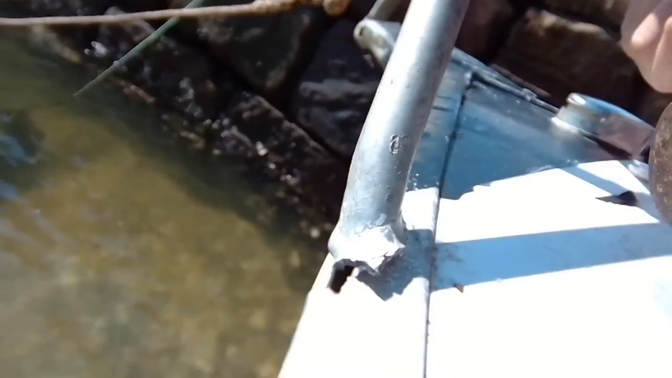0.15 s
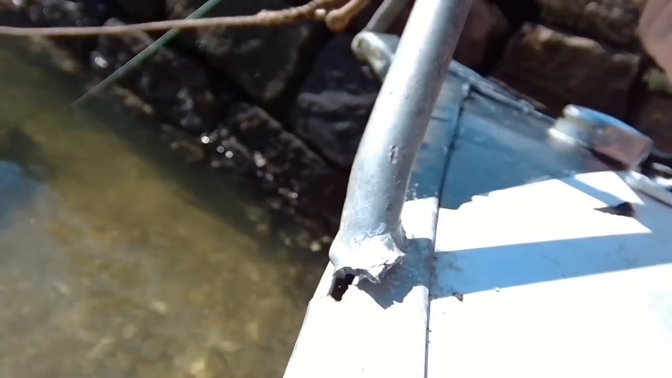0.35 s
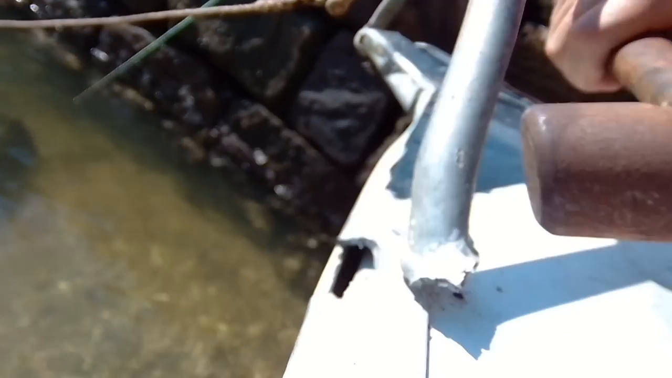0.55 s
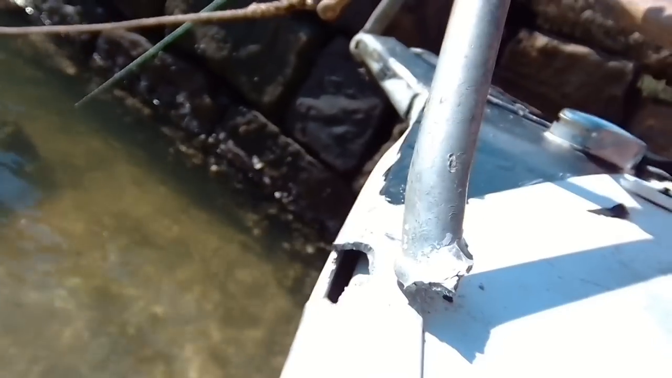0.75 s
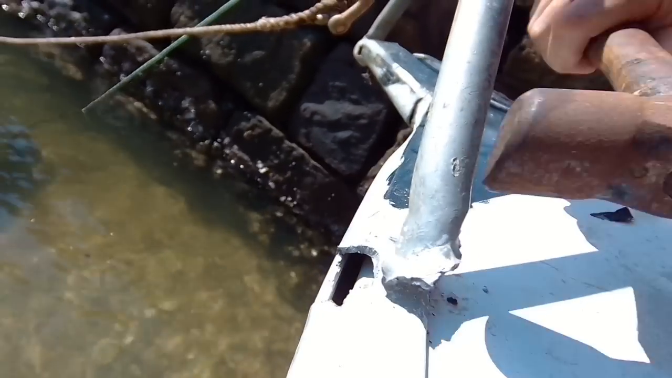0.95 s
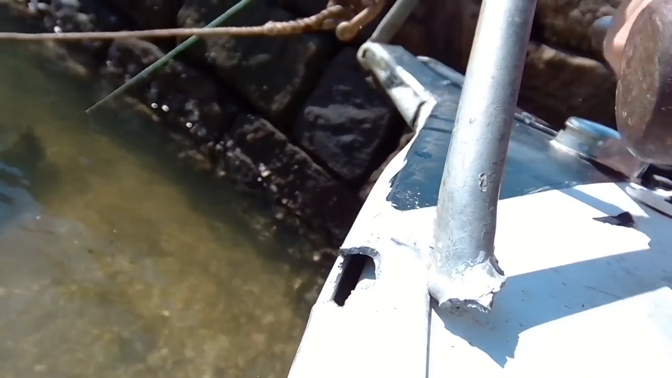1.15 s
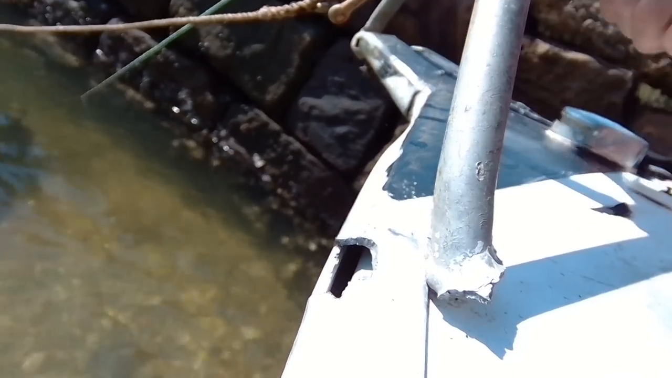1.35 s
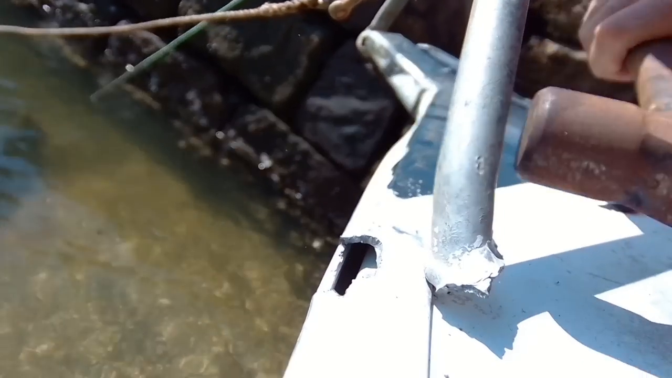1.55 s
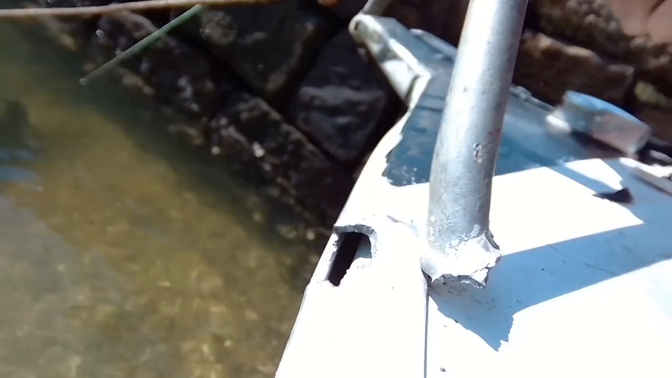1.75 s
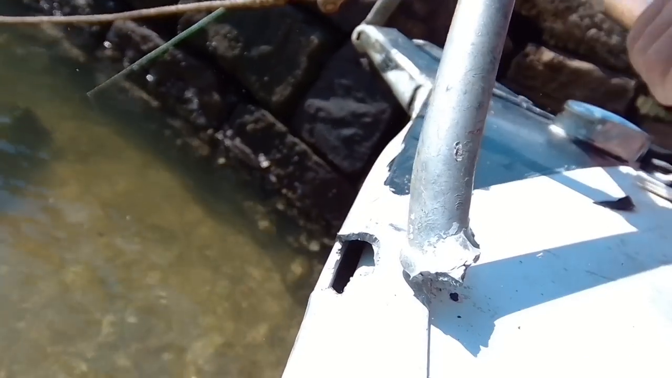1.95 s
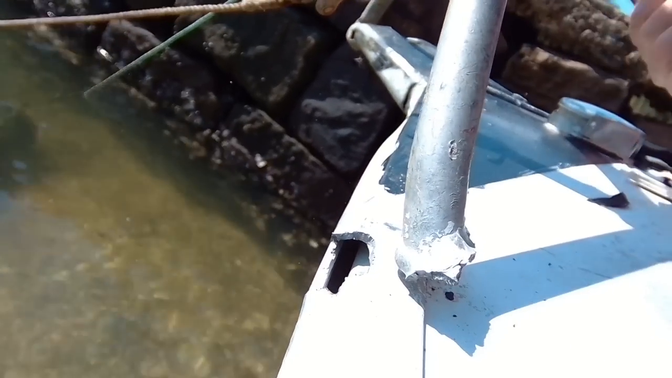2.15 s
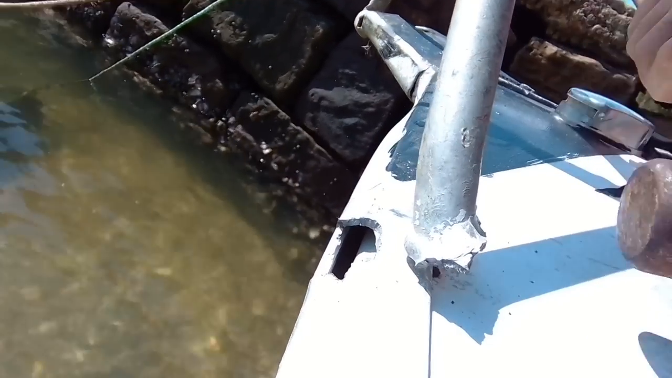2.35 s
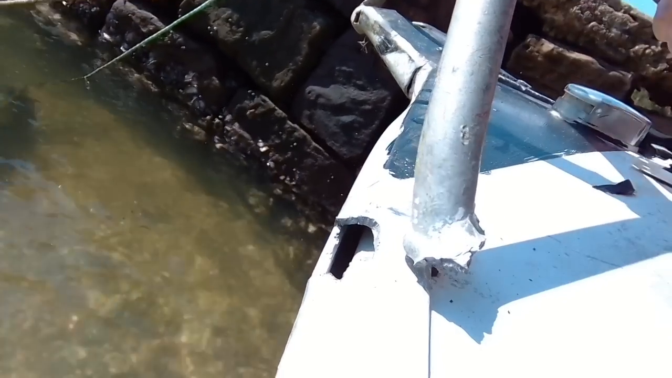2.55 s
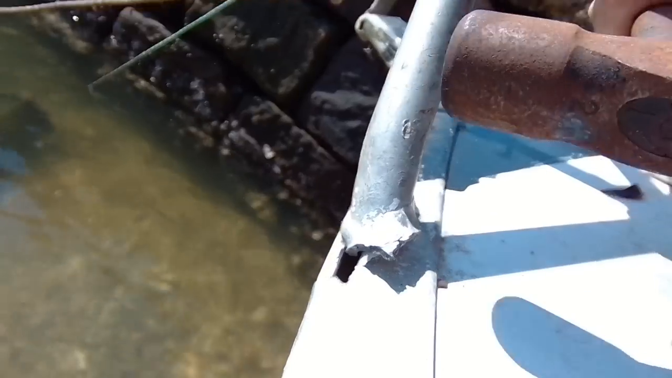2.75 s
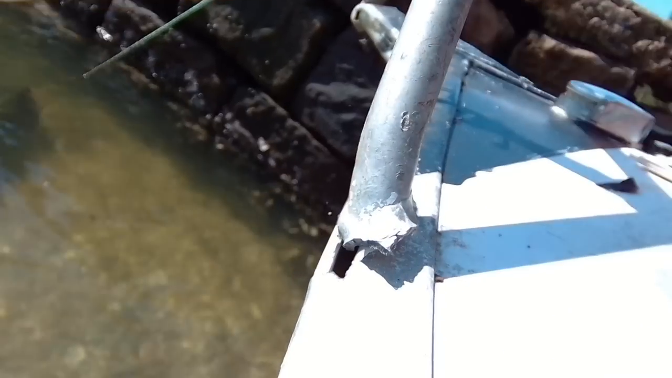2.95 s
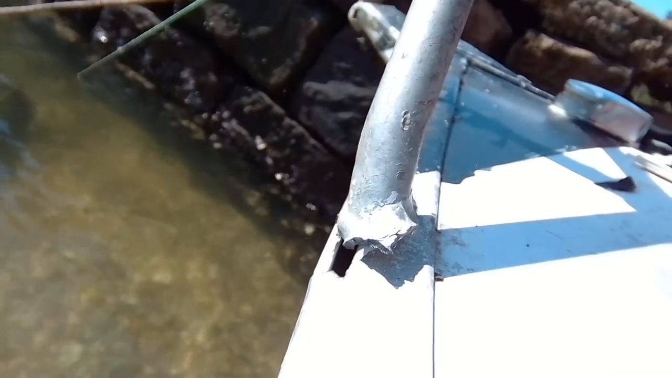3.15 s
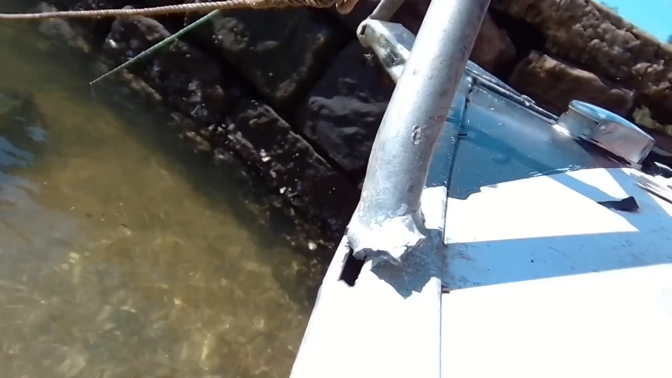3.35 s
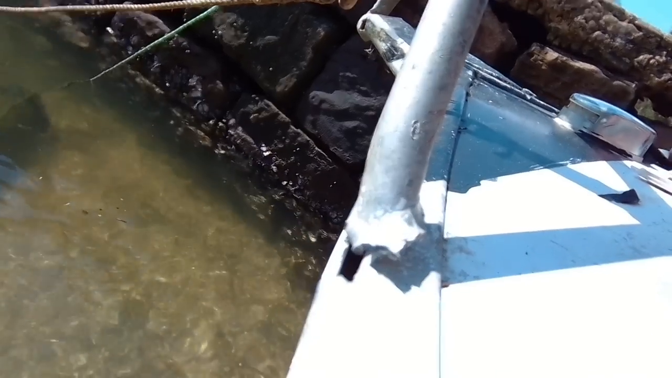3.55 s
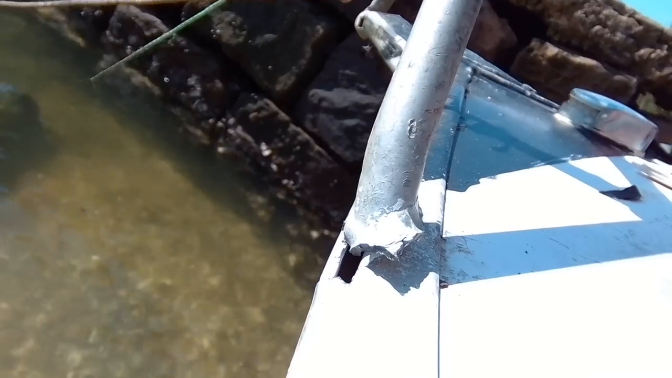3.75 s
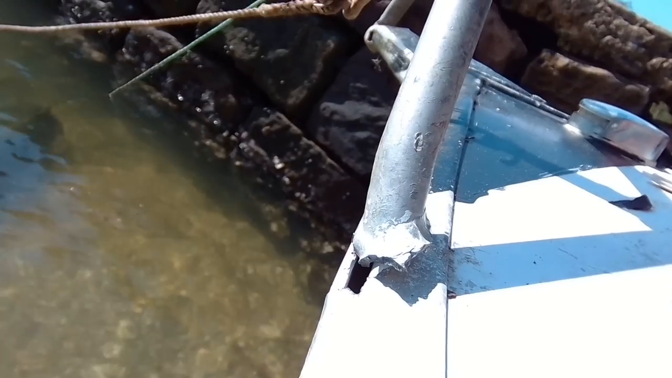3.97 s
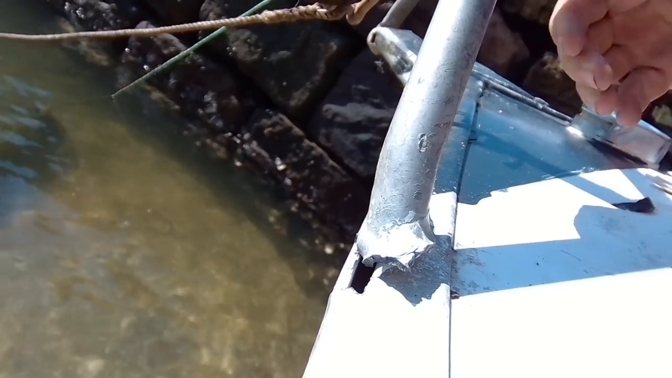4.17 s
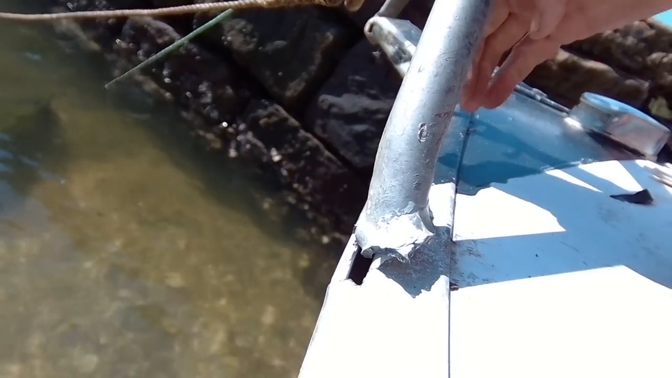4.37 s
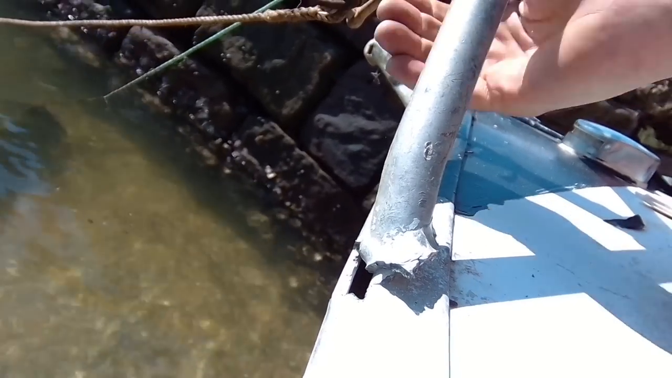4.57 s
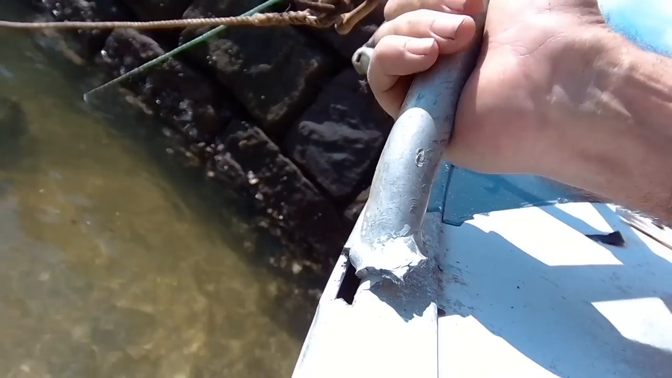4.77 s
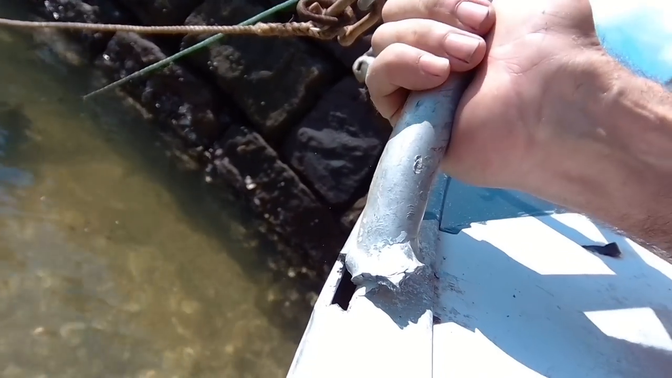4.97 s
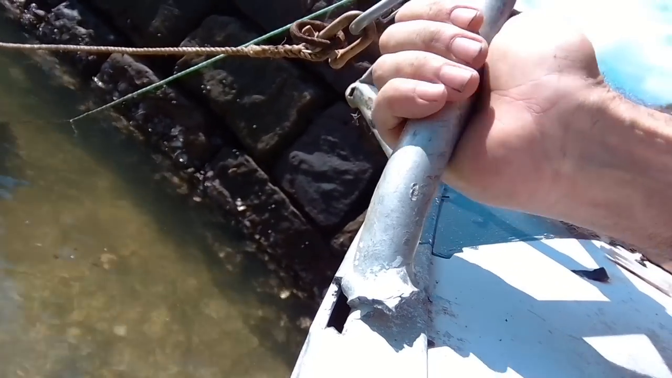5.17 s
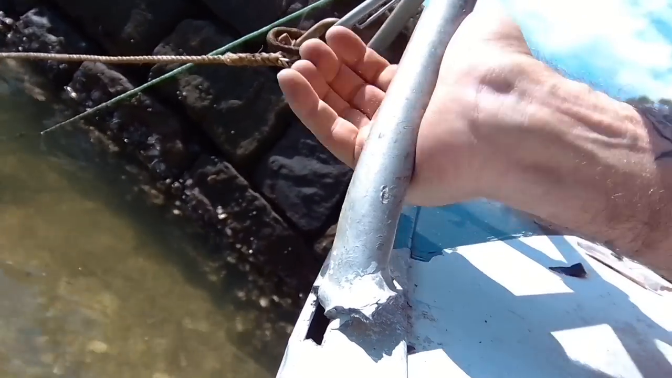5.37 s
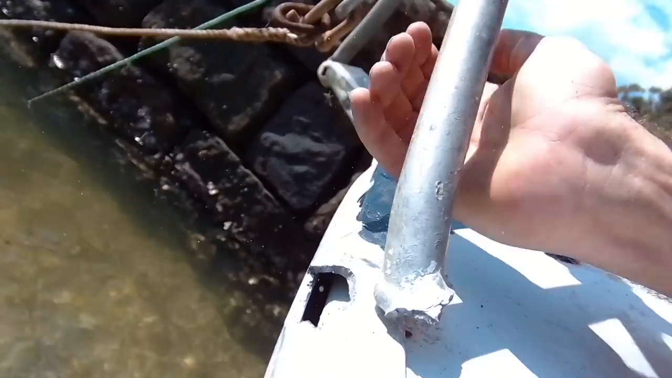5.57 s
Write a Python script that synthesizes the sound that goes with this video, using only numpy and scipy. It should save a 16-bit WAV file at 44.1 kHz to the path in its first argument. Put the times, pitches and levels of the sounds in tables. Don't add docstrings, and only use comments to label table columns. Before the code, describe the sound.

A heavy hammer clangs repeatedly on a hollow metal tube, each blow booming through a boat hull with rattling fittings, then is dropped and a hand tugs.

```python
import sys
import numpy as np
from scipy import signal
from scipy.fft import rfft, irfft, next_fast_len
from scipy.io import wavfile
from scipy.ndimage import uniform_filter1d, map_coordinates

SR = 44100
rng = np.random.default_rng(int(sys.argv[2]) if len(sys.argv) > 2 else 0)


def file_out(sig):
    cols = np.atleast_2d(sig).T
    lim = np.clip(cols, -1, 1)
    pcm = np.round(lim * 32767).astype(np.int16)
    wavfile.write(sys.argv[1], SR, pcm)


def linear_from_db(decibels):
    return 10 ** (np.asarray(decibels, float) / 20)


N = 247401
LOW_EDGE_HZ, TOP_EDGE_HZ = 2500, 9000


def unit(x):
    return x / np.sqrt(np.mean(x ** 2) + 1e-20)


def along(points, hz):
    f, v = np.transpose(points)
    return np.interp(np.log(hz + 1), np.log(f + 1), v)


def filtered(x, response):
    m = next_fast_len(x.shape[-1] + 8192)
    spectrum = rfft(x, m) * response(np.fft.rfftfreq(m, 1 / SR))
    return irfft(spectrum, m)[..., :x.shape[-1]]


def resonant(modes):
    def response(f):
        return sum((-1) ** k * linear_from_db(db) * 1j * f * width / (hz * hz - f * f + 1j * f * width)
                   for k, (hz, width, db) in enumerate(modes))
    return response


def tilt(low_db, top_db):
    points = [(LOW_EDGE_HZ * .8, low_db), (LOW_EDGE_HZ * 1.2, 0),
              (TOP_EDGE_HZ * .85, 0), (TOP_EDGE_HZ * 1.15, top_db)]
    return lambda f: linear_from_db(along(points, f))


def noise(count, colour):
    return unit(filtered(rng.standard_normal(count), colour))


def add(track, s, x):
    i = round(s * SR)
    track[i:i + len(x)] += x[:N - i]


def wobble(count, rate):
    knots = rng.standard_normal(int(count * rate / SR) + 4)
    return map_coordinates(knots, [np.arange(count) * rate / SR])


def ringing(hz, db, t60, t, blur=.8):
    flutter = 2.5 * wobble(len(t), rate=70)
    waver = blur * wobble(len(t), rate=50)
    return linear_from_db(db - 60 * t / t60 + flutter) * np.sin(2 * np.pi * hz * t + waver)


def stroke(start, peak, end, db):
    t = np.arange(N) / SR
    ends_db, edge_s = -17, 0.021
    swell = linear_from_db(db + np.interp(t, [start, peak, end], [ends_db, 0, ends_db]))
    return swell * np.clip(np.minimum(t - start, end - t) / edge_s, 0, 1)


# t/s, peak level/dB, low clang level/dB, top clang level/dB, wash level/dB
BLOWS = [(0.0991, -7, -8.5, -17, -19), (0.606, -12.5, -4.5, -13, -12.5), (0.6223, -20, -13, -25, -23),
         (1.0723, -7.5, -0.5, -16, -15), (1.511, -8, -1.5, -16.5, -15.5), (1.9324, -8, -6.5, -14.5, -15.5),
         (2.36, -11.5, -7, -12, -14.5), (2.7529, -10.5, -5, -16.5, -15.5)]
# first level/dB, then four levels/dB over the first
SPOTS = [(-18.5, -2, 3.5, 1, -23), (-21.5, 4.5, 7, -15.5, -21), (-35, 6.5, 17, -4, -21),
         (-15, -5, -2.5, -20, -30), (-23.5, -6, 5, -11, -25), (-11, -7.5, -10.5, -22.5, -28),
         (-15.5, -3.5, -9, 4, -21), (-14, -3.5, -15, -5, -22.5)]
SWAY_DB = [-40.5, -57.5, -59, -38.5, -39, -42, -43.5, -57.5]
# second, third and last strong mode f/Hz
BENT_HZ = [(3280, 4597, 3585), (3375, 4468, 4845), (3300, 4470, 4845), (3350, 4274, 4457),
           (3180, 4581, 3500), (3450, 4059, 3838), (3370, 4600, 4500), (3348, 3700, 6800)]
# f/Hz, level/dB
DENTS = [
    [(1200, -19.5), (1712, -21), (2401, -22), (4172, -23.5), (5389, -26)],
    [(1453, -24.5), (1965, -26), (2439, -26), (4307, -26), (7800, -28.5)],
    [(1453, -28), (1200, -26.5), (2410, -32), (4650, -24), (9530, -32.5)],
    [(1125, -16), (1276, -17.5), (1588, -22), (2132, -22), (5055, -24)],
    [(1109, -17.5), (1195, -17.5), (1650, -24.5), (2159, -25), (4888, -26.5)],
    [(1125, -21), (1432, -21.5), (2304, -20.5), (2428, -17.5), (5561, -25)],
    [(1206, -19), (1518, -25.5), (2353, -21), (3505, -24), (4829, -28.5)],
    [(1394, -18.5), (2051, -23.5), (2401, -23), (7036, -26.5), (8215, -24)],
]
# f/Hz, t60/s
DENT_T60 = [(1200, .14), (2400, 0.087), (5000, 0.071), (9000, .04)]
# f/Hz, level/dB, t60/s
STRONG_MODES = [(1850, -1, .1), (3320, -3, 0.08), (4610, -1.5, .08), (6890, 1, 0.039), (15710, 0.5, .16),
                (4920, -3, 0.07)]
# f/Hz, level/dB, t60/s
WEAK_MODES = [(3580, -25.5, .3), (4470, -23.5, 0.22), (8700, -10, 0.0098), (12100, -24, 0.083),
              (13800, -15.5, .03)]
# f/Hz, level/dB per Hz
CLANG = [(410, -24.5), (700, 2.5), (1960, -7), (2810, -8), (3290, -3.5), (4580, -6), (6370, -15.5),
         (6990, -17), (7560, -15), (15200, -36.5), (16500, -28)]
# f/Hz, level/dB per Hz
WASH = [(470, -10.5), (800, -6.5), (1920, -10), (2870, -26), (3560, -18), (3700, -24.5), (5620, -26),
        (12300, -36), (15500, -50), (16500, -45.5)]
# f/Hz, t60/s
WASH_T60 = [(800, 0.3), (2000, 0.31), (5000, 0.35), (10000, 0.17), (16000, .15)]


def hammer():
    out, t = np.zeros(N), np.arange(SR // 2) / SR
    for blow, spot, sway_db, bent, dent in zip(BLOWS, SPOTS, SWAY_DB, BENT_HZ, DENTS):
        s, db, low_db, top_db, wash_db = blow
        first_db, *over = spot
        modes = np.array(STRONG_MODES)
        modes[[1, 2, -1], 0] = bent
        lean = tilt(low_db + 2.5, top_db + 18.5)

        touch = np.minimum(t / .0006, 1) / (1 + (t / .012) ** 6)
        clang = touch * noise(len(t), lambda f: linear_from_db(along(CLANG, f)) * lean(f))

        lifts = [0] + over + over[1:2]
        ring = sum(ringing(hz, first_db + lift + level - 0.5, t60, t)
                   for (hz, level, t60), lift in zip(modes, lifts))
        ring += sum(ringing(hz, db + level - 13.0 + rng.normal(0, 5.3), t60, t)
                    for hz, level, t60 in WEAK_MODES)
        ring += sum(ringing(hz, level, along(DENT_T60, hz), t) for hz, level in dent)
        ring += ringing(461, sway_db + 3 * wobble(len(t), rate=20), 3.2, t, blur=0.77)

        source = noise(len(t), lambda f: linear_from_db(along(WASH, f)) * lean(f))
        hz, frames, z = signal.stft(source, SR, nperseg=128)
        fade = linear_from_db(-60 * frames / along(WASH_T60, hz)[:, None])
        wash = signal.istft(z * fade, SR, nperseg=128)[1][:len(t)]
        grit = linear_from_db(3.2 * wobble(len(t), rate=44))
        wash = linear_from_db(db + wash_db + 5.0) * grit * wash
        add(out, s, linear_from_db(db - 6.5) * clang + np.minimum(2000 * t, 1) * (ring + wash))
    return out


# f/Hz, width/Hz, level/dB
PANELS = [
    [(181, 61, -1), (211.5, 34, -9.5)],
    [(247.6, 11, -4.5), (292, 16, 0.5), (337, 34, -1.5), (383, 74, -7.5)],
    [(454.5, 38, 3.5), (528, 59, 1.5), (597, 66, -2), (673.6, 67, -5.5), (770, 62, -10.5),
     (924, 130, -13.5), (1125, 280, -17.5), (1554, 320, -23.5)],
]
# t/s, peak level/dB, rise/s, t60/s, f/Hz
DRUMS = [(.002, -45, 0.013, 1, 133.3), (.099, -22.5, 0.12, 0.41, 133), (.606, -14.5, 0.11, 0.47, 130),
         (1.072, -17.5, 0.068, 0.5, 138), (1.512, -18, 0.098, 0.27, 137), (1.932, -16.5, 0.045, 0.49, 136),
         (2.36, -23.5, .06, 0.72, 135), (2.751, -22.5, 0.011, 0.61, 136.2),
         (3.473, -9.5, 0.034, 0.095, 133.8), (3.574, -25.5, 0.041, 0.44, 137.3),
         (3.77, -32, 0.058, 0.83, 133.8), (5.487, -39, 0.057, 0.92, 136.4)]


def hull():
    rows = np.array(DRUMS)
    latest = np.maximum(np.searchsorted(rows[:, 0], np.arange(N) / SR) - 1, 0)
    turns = np.cumsum(rows[latest, -1]) / SR
    phase = 2 * np.pi * turns + .45 * wobble(N, rate=14)
    uneven = np.sqrt(2) * linear_from_db(2.4 * wobble(N, rate=30))
    parts = [uneven * (np.sin(phase) + 0.22 * np.cos(2 * phase))]
    for modes in PANELS:
        judder = rng.standard_normal(N) * linear_from_db(2.3 * wobble(N, rate=150))
        lowest, highest = modes[0][0], modes[-1][0]
        skirt = resonant([(np.sqrt(lowest * highest), 1.3 * highest - 0.16 * lowest, 0)])
        shaken = filtered(judder, lambda f: resonant(modes)(f) * skirt(f))
        swell = np.sqrt(np.abs(uniform_filter1d(shaken ** 2, size=1500)))
        parts.append(0.86 * unit(shaken / swell ** 0.8))
    return np.sum(shaking() * parts, axis=0)


# t/s, deck level/dB, held/s, t60 after/s, side panel level/dB over deck
SHAKES = [(.002, -36.5, 0.0097, 0.69, -0.5), (0.112, -7.5, 0.028, 0.47, -8), (.607, -17, 0.065, 0.83, -6.5),
          (1.08, -9.5, 0.053, 0.44, -0.5), (1.517, -3.5, .05, 0.34, -2.5), (1.942, -4, 0.057, 0.3, -9),
          (2.37, -8.5, 0.033, 0.31, -11.5), (2.763, -8, 0.032, 0.41, -12), (3.473, -11.5, 0.022, 0.13, -2),
          (3.496, -8.5, 0.031, 0.21, -4.5), (3.574, -19.5, 0.052, 0.29, 2.5),
          (3.77, -18, 0.087, 0.42, -2.5), (5.488, -19, 0.038, 0.95, -4.5)]
RIBS_DB = [-3.5, -6, -6.5, -2.5, -8, -10, -9.5, -10.5, -10.5, -7, -5.5, -10, -3.5]
# start t/s, peak t/s, end t/s, level/dB
PUSHES = [
    (4.427, 4.59, 4.746, -41.5),
    (4.802, 4.908, 5.16, -48.5),
]
PUSH_DB = -2.5, -3, -0.5, -0.5
# t/s, treble peak level/dB, low level/dB, top level/dB, length/s
CHATTER = [(0.246, -39.5, 8, -25, 0.013), (0.295, -42, 7.5, -27, 0.014), (0.331, -44.5, 5.5, -22, 0.0091),
           (0.3772, -41.5, 10.5, -22, 0.011), (0.423, -47, 7.5, -25, 0.0097), (0.4625, -53, 8, -22, 0.011),
           (1.1796, -32, 8, -22, 0.012), (1.2065, -29, 9.5, -17, 0.011), (1.2294, -36.5, 8.5, -17, 0.013),
           (1.244, -35.5, 8.5, -23, 0.012), (1.273, -44, 6, -22, 0.011), (1.2993, -44.5, 7.5, -22, 0.012),
           (1.3158, -50, 8, -22, 0.011), (1.356, -43, 9.5, -22, 0.0088), (1.399, -46, 8, -24, 0.011),
           (1.4446, -55, 7, -22, 0.01), (1.6204, -38.5, 7.5, -22, 0.011), (1.659, -38, 8.5, -20, 0.012),
           (1.676, -38, 8, -20, 0.011), (2.0675, -30, 9.5, -22, 0.012), (2.094, -38, 9.5, -24, 0.011),
           (2.1315, -38, 11, -21, 0.011), (2.176, -44, 8, -22, 0.011), (2.2153, -46, 9, -22, 0.018),
           (2.4735, -33.5, 8.5, -18, 0.011), (2.502, -39, 9.5, -20, 0.016), (2.5227, -34.5, 8, -22, 0.011),
           (2.5307, -31.5, 7.5, -22, 0.0091), (2.5598, -34.5, 8, -22.5, 0.014),
           (2.5778, -27.5, 6, -26, 0.011), (2.6056, -41.5, 6, -25, 0.01), (2.6496, -41, 7, -22, 0.012),
           (2.866, -38.5, 7, -21, 0.0097), (2.9014, -41, 6, -20, 0.011), (2.916, -35.5, 10.5, -22.5, 0.011),
           (2.9438, -43.5, 6, -24, 0.011), (2.96, -41, 5, -25, 0.013)]
CHATTER_LIFT_DB = 6


def shaking():
    out, t = np.zeros((4, N)), np.arange(N) / SR
    for s, db, rise, t60, _ in DRUMS:
        fall = linear_from_db(db - 60 * np.maximum(t - s - rise, 0) / t60)
        out[0] += fall * np.clip((t - s) / rise, 0, 1) ** 2

    nudges = []
    firmest_db = -34
    for s, db, low_db, *_ in CHATTER:
        firm_db = min(db + CHATTER_LIFT_DB + 5.0, firmest_db)
        nudges.append((s, firm_db + low_db / 2 - 9, 0, 0.34, 0.5))

    lead_s, lead_db = .02, -13
    let_go_db, let_go_s = -6.5, 0.004
    all_ribs_db = RIBS_DB + [0] * len(nudges)
    for (s, db, held, t60, side_db), ribs_db in zip(SHAKES + nudges, all_ribs_db):
        free = np.maximum(t - s - held, 0)
        start = min([s] + [blow[0] for blow in BLOWS if abs(s - blow[0]) < lead_s])
        drop_db = let_go_db * (1 - np.exp(-free / let_go_s))
        drive = linear_from_db(db + lead_db * (t < s) + drop_db) * (t > start)
        fall_db = -60 * free / t60
        ribs_fall_db = 0.95 * fall_db
        out[1:] += drive * linear_from_db(np.array([side_db + fall_db, fall_db, ribs_db + ribs_fall_db]))
    out += linear_from_db(np.array(PUSH_DB))[:, None] * sum(stroke(*row) for row in PUSHES)
    return uniform_filter1d(out, size=100, axis=1)


# t/s, peak level/dB
KNOCKS = [(0.109, -7), (0.607, -21), (1.081, 7), (1.519, 6.5), (1.945, 1.5), (2.371, -3.5), (2.764, 0.5),
          (3.472, -7), (3.497, 1), (3.575, -15), (3.605, -23), (3.77, -9.5), (4.57, -28), (5.439, -43),
          (5.489, -14)]
# t/s, peak level/dB
THUMPS = [
    (0.111, -26.5),
    (0.613, -24.5),
    (1.078, -18.5),
    (1.517, -21),
    (1.934, -32),
    (2.369, -27),
    (2.757, -23.5),
    (3.499, -50),
    (3.781, -28.5),
    (5.499, -35),
]


def knocks():
    out, t = np.zeros(N), np.arange(SR // 2) / SR
    modes = np.concatenate(PANELS)
    for s, db in KNOCKS:
        ring = sum(linear_from_db(level + rng.normal(0, 2.8)) * np.sin(2 * np.pi * hz * t) for hz, _, level in modes)
        contact = np.minimum(t / .0012, 1)
        add(out, s, -linear_from_db(db - 11.0 - 60 * t / 0.038) * contact * ring)
    for s, db in THUMPS:
        push = np.exp(-t / .009) * np.sin(2 * np.pi * 70 * t)
        slosh = np.exp(-t / .1) * noise(len(t), lambda f: resonant([(85, 45, 0)])(f) ** 2)
        slosh = slosh * np.minimum(t / 0.014, 1)
        add(out, s, linear_from_db(db + 6.5) * (push + linear_from_db(-9.0) * slosh))
    return out


# t/s, peak level/dB, low level/dB, top level/dB
REBOUNDS = [(0.1385, -30.5, -1.5, -26.5), (.1694, -30.5, 2, -20), (.202, -38, -8, -20),
            (0.654, -18.5, -4, -12.5), (0.6713, -22.5, -5, -25.5), (.686, -25, -7.5, -23),
            (0.7352, -34, 7.5, -32.5), (1.1094, -23, -5, -20.5), (1.136, -26, 1.5, -11),
            (1.532, -15, 4.5, -29.5), (1.5725, -17, -5, -34), (1.9625, -13.5, -10.5, -9.5),
            (2.0169, -25, 0, -27.5), (2.3903, -18, -7, -8), (2.4493, -29.5, 1.5, -13),
            (2.789, -35.5, 3.5, -20), (2.8233, -29, 12, -22), (5.4908, -28.5, 10, -15.5),
            (5.501, -33, 1.5, -22), (5.5121, -19, -3.5, -27), (5.531, -32, 1, -22), (5.546, -31, 12, -24),
            (5.561, -25.5, 3, -19.5), (5.578, -33, 6.5, -22), (5.597, -32.5, 2, -24)]
# t/s, peak level/dB, low level/dB
TAPS = [
    (3.199, -55, 4.5),
    (4.8963, -53, 5),
    (5.0294, -51, 11),
    (5.128, -60, -4),
    (5.271, -60, -10),
    (5.325, -52, -17),
]
# t/s, peak level/dB, low level/dB, top level/dB, length/s
BOUNCES = [(3.472, -23.5, 11, -20, 0.01), (3.495, -18, 1, -28, 0.005), (3.5744, -23.5, 2, -36, 0.0077),
           (3.6045, -34, -7, -32, 0.0091), (3.625, -32.5, 9.5, -23, 0.016), (3.684, -51, -7.5, -8, 0.009),
           (3.773, -28.5, 14, -19.5, 0.0094), (3.78, -39, 14, -26, 0.01), (3.82, -57, 13, -31, 0.011),
           (3.8501, -51, 15.5, -27.5, 0.012), (3.876, -55, 15, -31, 0.011)]
# t/s, level/dB, f/Hz, t60/s
PINGS = [
    (.654, -38.5, 8900, .12),
    (.11, -46, 4600, .4),
    (.11, -37.5, 3585, 0.18),
    (1.245, -51.5, 3580, .2),
    (3.197, -49.5, 2900, 0.0295),
    (3.2, -54, 1126, .12),
    (3.205, -57, 1290, .12),
]


def fittings():
    out, t = np.zeros(N), np.arange(SR // 2) / SR
    for s, db, hz, t60 in PINGS:
        add(out, s, ringing(hz, db, t60, t, blur=2.2) * np.minimum(t / .002, 1))
    rebounds = [(*row, .011) for row in REBOUNDS]
    chatter = [(s, db + CHATTER_LIFT_DB, *rest) for s, db, *rest in CHATTER]
    taps = [(*row, -16, 0.016) for row in TAPS]
    out += contacts(rebounds, crack_share=2.6, flat=0.23, rise_s=0.00026)
    out += contacts(chatter, crack_share=1.3, flat=0.13, rise_s=0.001)
    out += contacts(taps, crack_share=1.0, flat=0.24, rise_s=0.0019)
    out += contacts(BOUNCES, crack_share=4.0, flat=0.23, rise_s=0.00059, lift_db=-1)
    return out


# f/Hz, width/Hz, level/dB
FITTINGS = [(860, 440, 7.5), (1363, 240, 10), (1526, 150, 6.5), (3072, 400, -0.5), (3580, 90, 2),
            (4074, 350, 1), (4700, 130, -2), (5175, 240, -2.5), (5894, 300, -3.5), (7400, 200, -11),
            (8960, 200, -11.5), (11800, 120, -5)]


def contacts(events, crack_share, flat, rise_s, lift_db=0):
    out, t = np.zeros(N), np.arange(SR // 10) / SR
    for s, db, low_db, top_db, length in events:
        lean = tilt(low_db - 1.5 - lift_db, top_db + 13.5)
        modes = FITTINGS + rng.standard_normal((len(FITTINGS), 3)) * [60, 0, 3.5]

        def body(f):
            return (resonant(modes)(f) + flat) * lean(f) / (1 + (700 / (f + 1)) ** 4)

        fade = np.exp(-t / np.clip(length, .002, .03))
        grit = rng.standard_normal(len(t)) * linear_from_db(5.3 * wobble(len(t), rate=400)) * fade
        spray = filtered(grit, body)
        spray = 2.42 * spray / np.abs(spray).max()
        tick = filtered(rng.standard_normal(len(t)) * np.exp(-t / 0.00073), body)
        tick = crack_share * tick / np.abs(tick).max()
        add(out, s, linear_from_db(db - 7 + lift_db) * (spray + tick) * np.minimum(t / rise_s, 1))
    return out


# start t/s, peak t/s, end t/s, low level/dB, hiss level/dB over low
HAND = [
    (3.18, 3.21, 3.29, -59.5, -21),
    (4.84, 4.9, 5.2, -60, -17),
    (5.41, 5.44, 5.48, -60, -26),
    (4.32, 4.345, 4.375, -74, 5),
    (4.42, 4.46, 4.58, -56, 1),
    (4.42, 4.58, 4.78, -58, -17),
    (4.5, 4.62, 4.74, -78, 5),
    (5.12, 5.3, 5.5, -80, 4),
    (5.455, 5.484, 5.51, -60, -3),
]
# f/Hz, level/dB per Hz
SKIN = [(410, -22), (700, -15), (788, -6), (1210, -16), (1710, -16.5), (2350, -28.5), (4470, -11.5),
        (6310, -24), (9020, -21), (12000, -36.5), (15600, -51), (22000, -120)]
# t/s, peak level/dB, f/Hz
CHIRP = [
    (5.3603, -43.5, 3940),
]


def hand():
    low = noise(N, lambda f: linear_from_db(along(SKIN, f)) * (f < LOW_EDGE_HZ))
    hiss = noise(N, lambda f: linear_from_db(along(SKIN, f)) * (f >= LOW_EDGE_HZ))
    slips = linear_from_db(2.2 * wobble(N, rate=45) + 2.7 * wobble(N, rate=180))
    out = slips * sum(stroke(*row) * (low + linear_from_db(hiss_db) * hiss) for *row, hiss_db in HAND)
    t = np.arange(SR // 50) / SR
    for s, db, hz in CHIRP:
        swell = np.sin(np.pi * np.minimum(t / 0.0032, 1))
        add(out, s, linear_from_db(db) * swell * np.sin(2 * np.pi * hz * t * (1 + 3 * t)))
    return out


# t/s, level/dB
WHINE = [(0, -78), (3.25, -78), (3.4, -64), (3.9, -69.5), (4.1, -74.5), (4.3, -67), (4.6, -61), (4.75, -81),
         (5.62, -79.5)]
# f/Hz, width/Hz, level/dB
WHINE_HZ = [(1739, 70, -2), (3700, 300, -14.5), (4700, 250, -16.5)]


def pump():
    s, db = np.transpose(WHINE)
    whine = noise(N, lambda f: resonant(WHINE_HZ)(f) ** 2)
    level_db = np.interp(np.arange(N) / SR, s, db) - 7.5
    return linear_from_db(level_db + 3 * wobble(N, rate=9)) * whine


# f/Hz, level/dB per Hz
AIR = [(20, -40), (40, -10.5), (65, 2), (130, -4.5), (250, -12), (370, -11), (600, -21.5), (1000, -27),
       (1730, -37), (2300, -38), (5000, -49), (10000, -60.5), (16000, -74.5)]


def air():
    return linear_from_db(-49 + 1.1 * wobble(N, rate=4.5)) * noise(N, lambda f: linear_from_db(along(AIR, f)))


def scene():
    return (hammer() + hull() + knocks() + fittings() + hand() + pump() + air())[None]


def top_cut(x):
    return signal.sosfilt(signal.butter(12, 16760, fs=SR, output="sos"), x)


def record(dry):
    bass_cut = signal.butter(2, 48, "high", fs=SR, output="sos")
    thinned = signal.sosfilt(bass_cut, dry)
    clipped = thinned / (1 + np.abs(thinned) ** 8) ** (1 / 8)
    top_hz = 16100
    mix = filtered(clipped, lambda f: 1 / (1 + (f / top_hz) ** 80))
    return top_cut(mix)


dry = scene()
out = record(dry)
file_out(out)
```